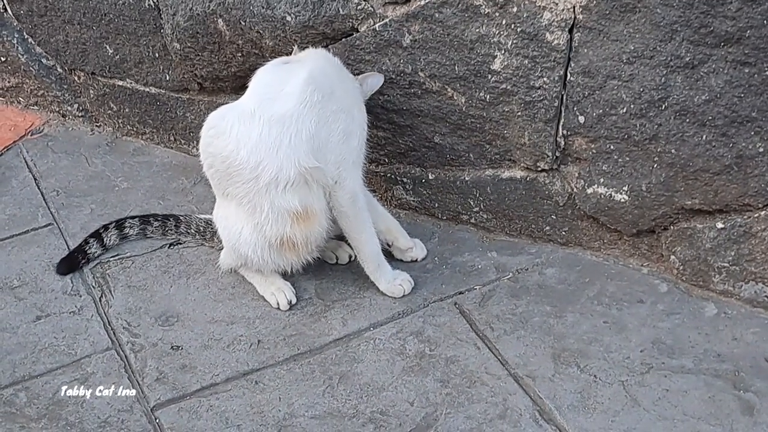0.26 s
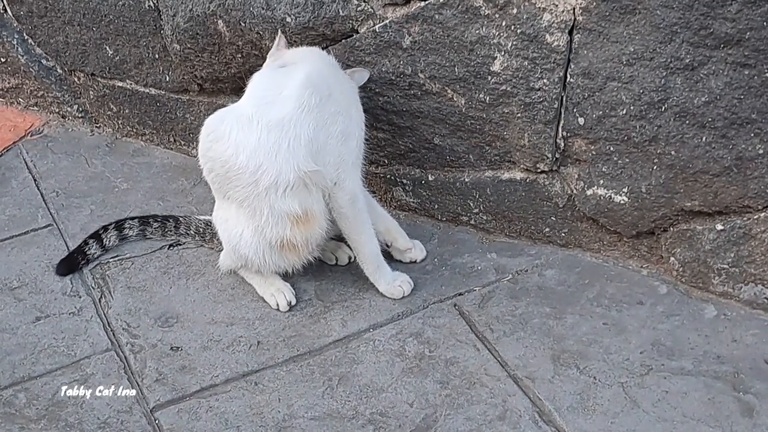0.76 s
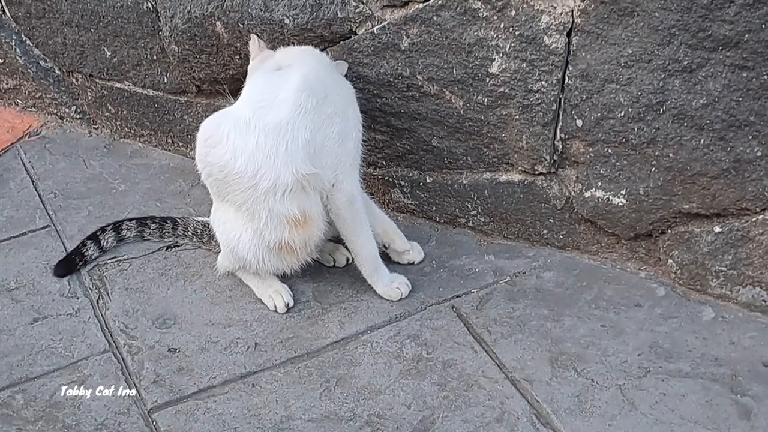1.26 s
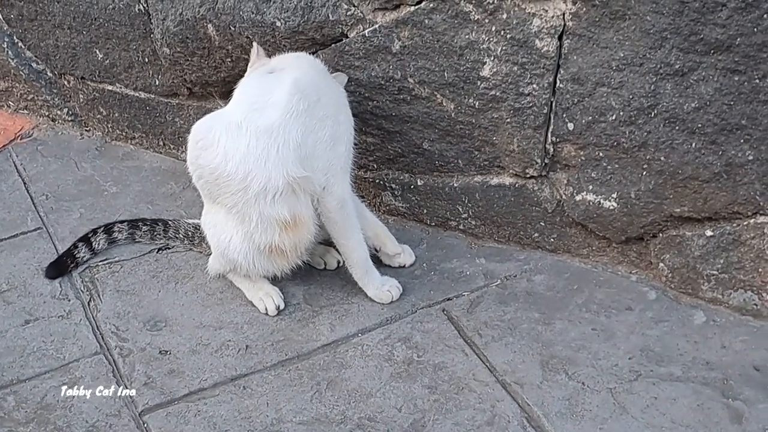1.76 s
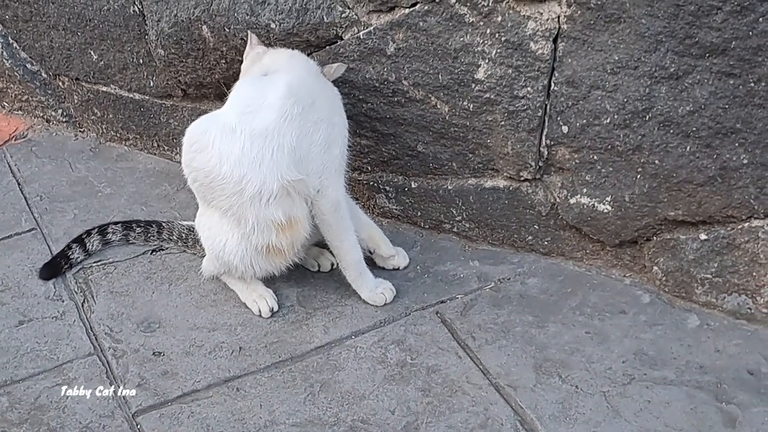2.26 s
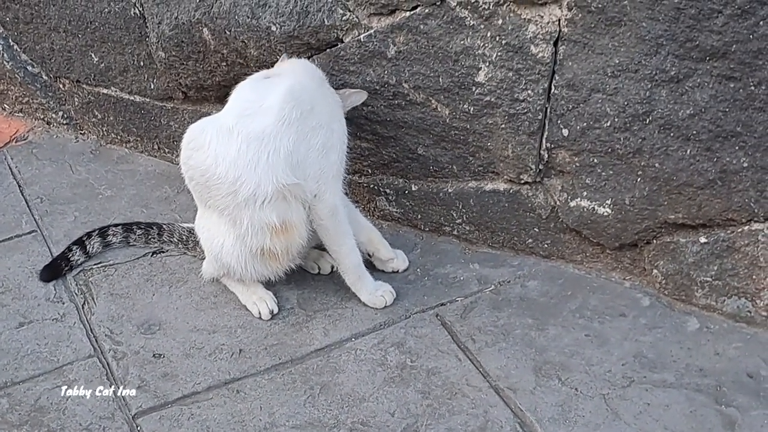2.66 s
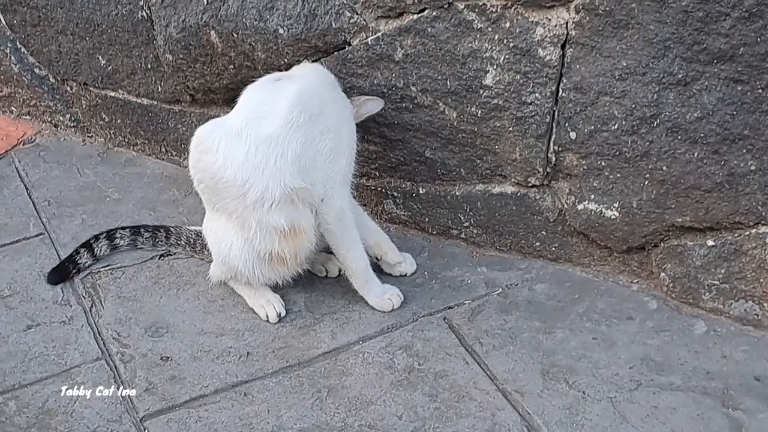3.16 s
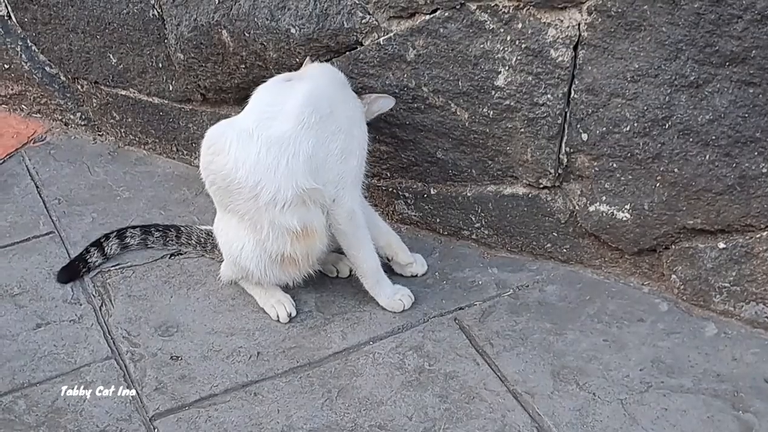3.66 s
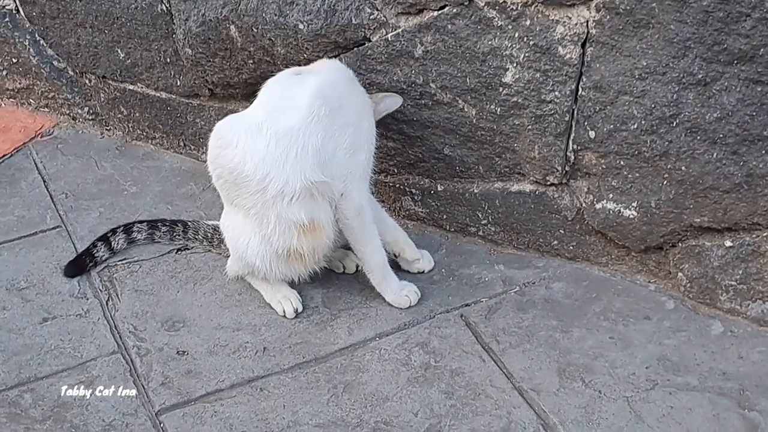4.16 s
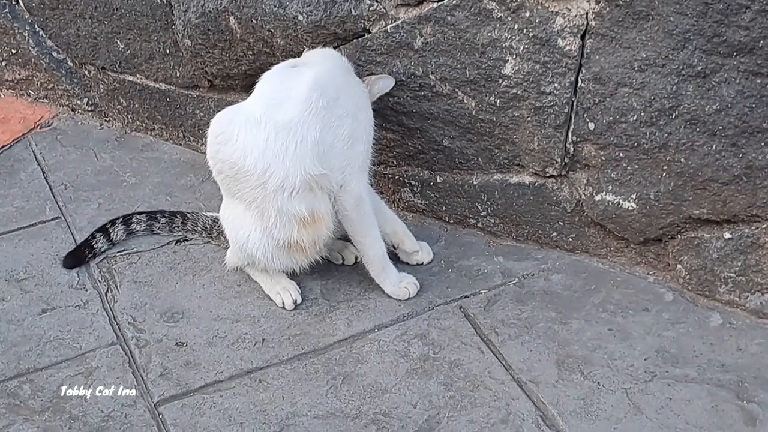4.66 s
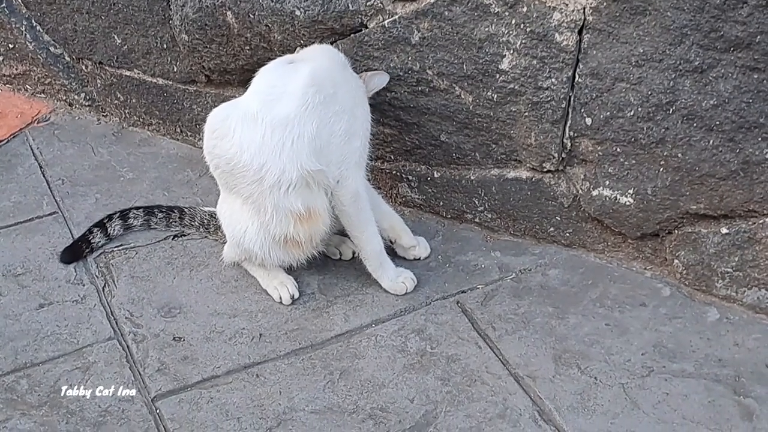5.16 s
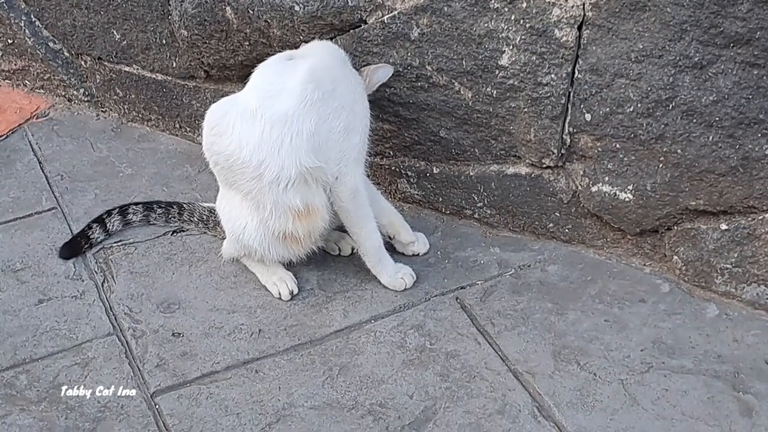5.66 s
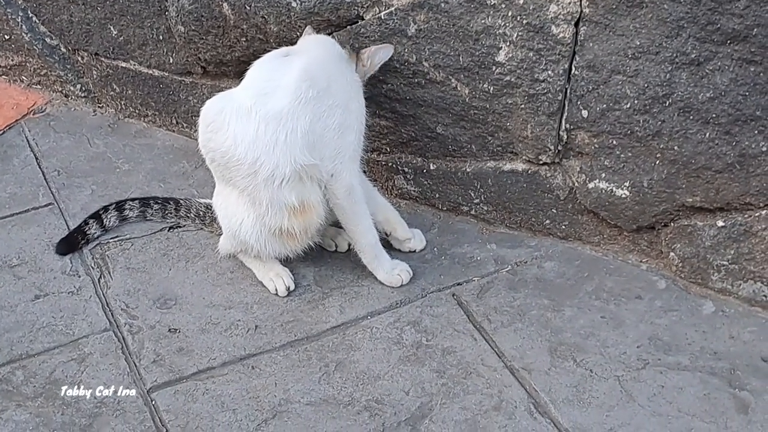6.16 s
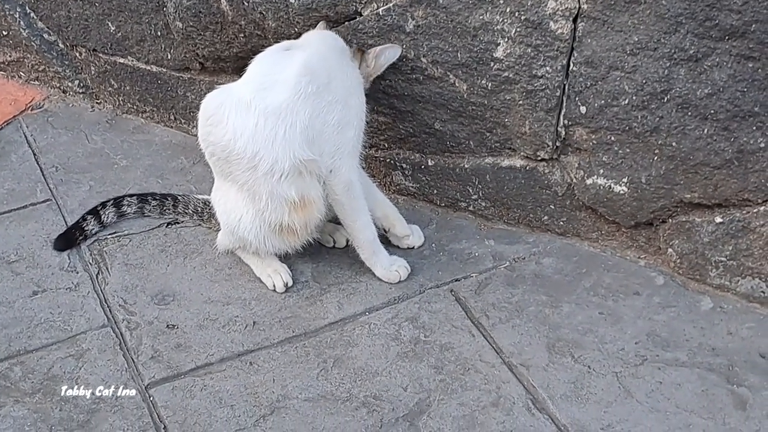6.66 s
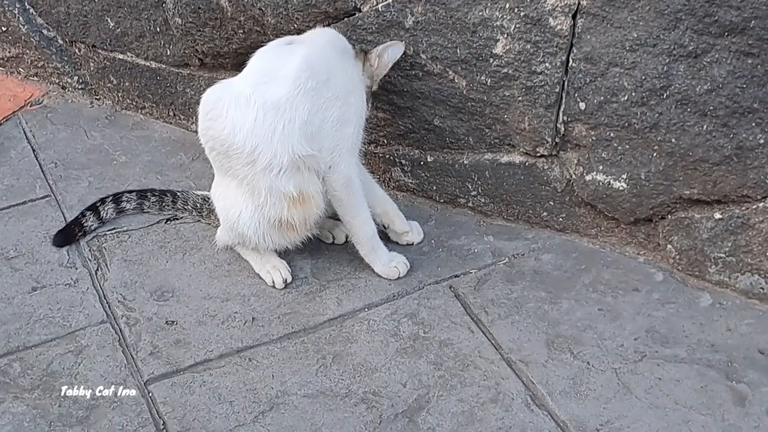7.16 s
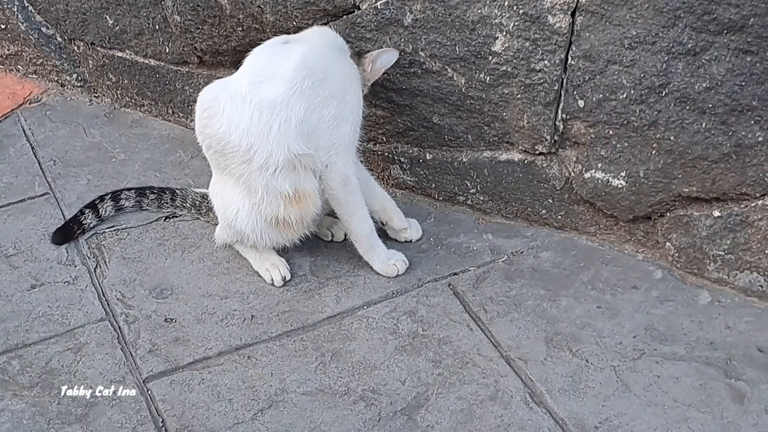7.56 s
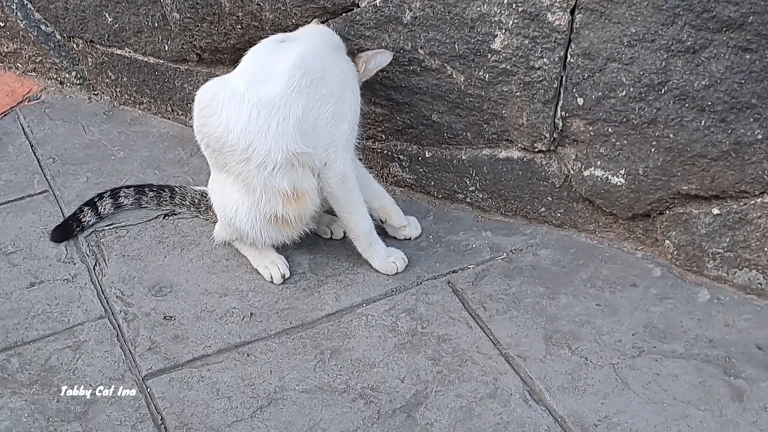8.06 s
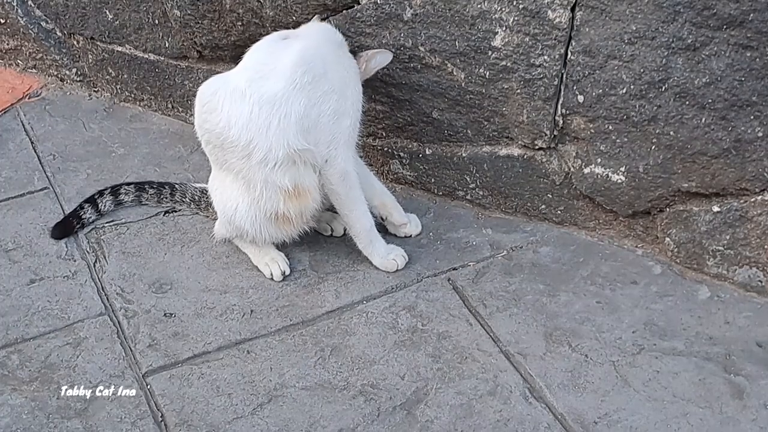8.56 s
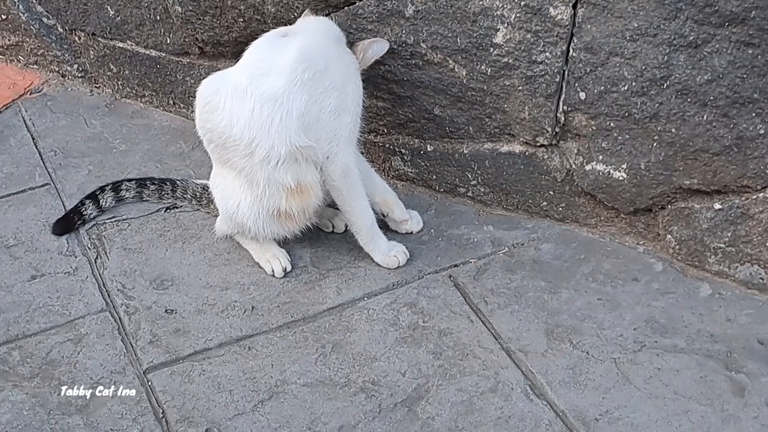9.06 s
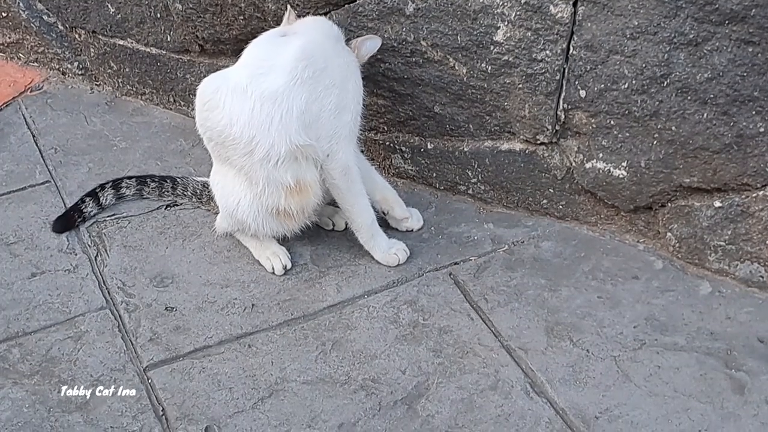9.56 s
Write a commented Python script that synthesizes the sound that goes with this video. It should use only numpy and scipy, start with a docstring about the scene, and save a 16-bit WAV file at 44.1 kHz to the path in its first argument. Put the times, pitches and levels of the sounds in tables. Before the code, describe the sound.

A single-cylinder motorbike putters up a stone-walled street, accelerates close past from right to left, then fades with two dips in engine note over town rumble.

```python
"""Motorbike passing along a stone street

A single-cylinder motorbike accelerates, passes close by from right to left and dips its engine note
twice as it leaves. Rings from pulses make its exhaust, shaped noise its tyres and chain, and fading
noise tails the answer of the walls. Town engines rumble in filtered noise and pulses; a wavering
tone is a faint brake squeal, filtered clicks are dull thuds, and bursts of noise make a few short
swishes and low swells of rumble."""
import sys
import numpy as np
from scipy import signal
from scipy.fft import rfft, irfft, next_fast_len
from scipy.io import wavfile
from scipy.ndimage import uniform_filter1d, map_coordinates

SR = 44100
rng = np.random.default_rng(int(sys.argv[2]) if len(sys.argv) > 2 else 0)


def transcribe(signal):
    """Save signal, clipped to [-1, 1], as a 16-bit WAV file at the path in sys.argv[1]."""
    frames = np.atleast_2d(signal).T
    limited = np.clip(frames, -1, 1)
    pcm = np.round(limited * 32767).astype(np.int16)
    wavfile.write(sys.argv[1], SR, pcm)


N = 432168

PASS_S, BIKE_M_PER_S, CLOSEST_M = 3.934, 5.57, 4.18  # when, how fast and how near the bike goes by
EAR_LAG_MS = 0.517  # between the ears, for a sound from far along the street


def amp(db):
    """Decibels turned into a plain gain."""
    return 10 ** (np.asarray(db) / 20)


def unit(x):
    """x scaled to an rms (average strength) of 1."""
    return x / np.sqrt(np.mean(x ** 2) + 1e-20)


def steady(x):
    """x with its strength over each quarter second held near 1."""
    power = np.mean(np.atleast_2d(x) ** 2, axis=0)
    return x / np.sqrt(np.abs(uniform_filter1d(power, SR // 4)) + 1e-20)


def along(points, hz):
    """Values read between (Hz, value) points, on a log frequency axis."""
    point_hz, values = np.transpose(points)
    return np.interp(np.log(hz + 1), np.log(point_hz), values)


def curves(rows):
    """One value per sample for each column after the time."""
    s, *columns = np.transpose(rows)
    return [np.interp(np.arange(N) / SR, s, column) for column in columns]


def wobble(rate):
    """A smooth random curve through rate random points a second."""
    points = rng.standard_normal(int(N * rate / SR) + 4)
    return map_coordinates(points, [np.arange(N) * rate / SR])


def bump(s, half_s):
    """A soft rise and fall around time s."""
    return np.exp(-((np.arange(N) / SR - s) / half_s) ** 2)


def swells(rows):
    """A level curve of soft bumps."""
    return sum(amp(db) * bump(s, half_s) for s, half_s, db in rows)


def filtered(x, response):
    """x with each frequency scaled and shifted by a complex response."""
    size = next_fast_len(N + SR // 2)
    spectrum = rfft(x, size) * response(np.fft.rfftfreq(size, 1 / SR))
    return irfft(spectrum, size)[..., :N]


def resonance(hz, centre_hz, width_hz, count=2):
    """Like chambers in a row: one starts sharply, two swell."""
    damping = 1j * hz * width_hz
    return (damping / (centre_hz ** 2 - hz ** 2 + damping)) ** count


def swept(x, centre_hz, width_hz, count=2):
    """A moving resonance as a cross-fade of 12 fixed ones."""
    centres = np.geomspace(centre_hz.min(), centre_hz.max(), 12)
    place = np.interp(centre_hz, centres, np.arange(len(centres)))
    total = 0
    for k, centre in enumerate(centres):
        share = np.maximum(1 - abs(place - k), 0)
        total = total + share * filtered(x, lambda hz: resonance(hz, centre, width_hz, count))
    return total


def muffled(x, edge_hz):
    """A steep treble cut takes off the sharp front of each pulse, as a silencer's packing does."""
    return signal.sosfilt(signal.butter(6, edge_hz, fs=SR, output="sos"), x)


def lagged(x, lag_ms):
    """x in both ears, later in the left one when the lag is positive."""
    left = map_coordinates(x, [np.arange(N) - lag_ms * SR / 1000])
    return np.array([left, x])


def rush(spectrum, direct, lag_ms, patchy_db, apart_hz=700):
    """Patchy stereo noise: a direct share of power, the rest diffuse and alike only below apart_hz."""
    grains = signal.stft(rng.standard_normal((3, N)), nperseg=1024)[2]
    patches = rng.standard_normal(grains.shape[1:])
    patches = uniform_filter1d(uniform_filter1d(patches, 4, 0), 14, 1)  # smooth over pitch, then time
    noise = signal.istft(grains * amp(patchy_db * unit(patches)), nperseg=1024)[1][:, :N]

    def split(hz):
        return np.sqrt(.5 + np.outer([.5, -.5], np.exp(-(hz / apart_hz) ** 2)))
    mid, side = filtered(noise[:2], split)
    diffuse = np.array([mid + side, mid - side])
    pair = np.sqrt(direct) * lagged(noise[2], lag_ms) + np.sqrt(1 - direct) * diffuse
    return unit(filtered(pair, lambda hz: amp(along(spectrum, hz))))


def street(x, lag_ms, apart_hz, wet, count=11):
    """Walls return a fading echo, alike in both ears below apart_hz; wet is its share of the power."""
    # Each row: frequency in Hz, time to fade by 60 dB in seconds.
    fade_times = [(80, 1), (400, 0.58), (3000, 0.94)]
    hz, t, grains = signal.stft(rng.standard_normal((count, 2, SR // 3)), SR, nperseg=256)
    fade_db = -60 * t / along(fade_times, hz)[:, None]
    tails = signal.istft(grains * amp(fade_db), SR, nperseg=256)[1]
    # every stretch of road has its own echo pattern
    hop = N // (count - 1) + 1
    padded, answer = np.pad(x, (hop, 2 * hop)), np.zeros((2, 2 * N))
    for k, tail in enumerate(tails):
        stretch = padded[k * hop:][:2 * hop] * signal.windows.cosine(2 * hop)
        echo = signal.fftconvolve(stretch[None], tail, axes=1)
        answer[:, k * hop:][:, :echo.shape[1]] += echo
    mid, side = answer[:, hop:][:, :N]
    side = filtered(side, lambda f: f / np.hypot(f, apart_hz))
    walls = steady(np.array([mid + side, mid - side]))
    return steady(np.sqrt(1 - wet) * lagged(steady(x), lag_ms) + np.sqrt(wet) * walls)


def ride():
    """The bike's distance (m) and its bearing, from -1 (coming) to 1 (going)."""
    along_m = BIKE_M_PER_S * (np.arange(N) / SR - PASS_S)
    distance_m = np.hypot(along_m, CLOSEST_M)
    return distance_m, along_m / distance_m


def passing(db, doubling_db, shut_db, rear_db):
    """Gain of a bike part: db alongside at full throttle, less doubling_db per doubling of distance,
    less shut_db with the throttle shut, plus rear_db from behind."""
    # The rider opens up, shuts off to shift, rides on gently and shuts off again.
    # Each row: time in seconds, throttle from 0 to 1.
    throttle_points = [(0, 0.31), (1.85, 0.2), (2.35, 0.97), (6.3, 0.98), (6.55, 0.47), (7, 0.2),
                       (7.8, 0.46), (8.9, 0.2), (9.6, 0.06)]
    distance_m, bearing = ride()
    throttle, = curves(throttle_points)
    far_db = doubling_db * np.log2(distance_m / CLOSEST_M)
    return amp(db - far_db - shut_db * (1 - throttle) + rear_db * bearing)


def firings(turns, scatter_db, jitter_s):
    """One pressure pulse per firing, each a little different in size and timing."""
    at = np.flatnonzero(np.diff(np.floor(turns)))
    chance = rng.standard_normal((len(at), 2))
    at = np.clip(at + jitter_s * SR * chance[:, 0], 0, N - 1).astype(int)
    return np.bincount(at, amp(scatter_db * chance[:, 1]), N)


def exhaust(turns):
    """Each firing swells and rings in the silencer's chambers and the tail pipe, above clean low orders."""
    # The exhaust changes colour as the pipe swings past.
    # Each row: time in seconds, thump pitch in Hz, bark pitch in Hz.
    pipe = [(0, 88, 212), (1.3, 96, 244), (2.05, 110.4, 253), (2.55, 113, 335), (2.85, 122, 297),
            (3.1, 139, 280), (3.35, 176, 280), (3.7, 168.4, 314), (4.6, 171.4, 341), (5.1, 187, 250),
            (6.1, 203, 243), (6.9, 131, 277), (7.8, 148, 304), (8.45, 172, 321), (9.1, 131, 220)]
    # Share of the sound coming by way of the walls, least when the pipe is in plain view.
    # Each row: time in seconds, share from 0 to 1.
    indirect = [(0, .45), (2.3, .38), (3, .27), (3.35, .07), (4.6, .1), (5.3, .35), (6.5, .6), (9, .85)]
    # Single multiples of the firing rate ring out as pipe and walls reinforce them.
    # Each row: time in seconds, half length in seconds, multiple of the firing rate, level in dB.
    hum_rows = [(1.297, 0.18, 12, -34.5), (1.49, 0.22, 4, -27.5), (2, 0.16, 5, -26), (2.4, 0.19, 4, -29),
                (2.92, 0.14, 11, -37), (3.093, 0.33, 3, -37), (3.047, 0.16, 4, -36),
                (4.297, 0.31, 3, -27.5), (4.244, 0.18, 6, -33), (5.2, 0.37, 6, -38), (5.394, 0.1, 17, -41),
                (5.42, 0.098, 16, -51), (5.8, 0.12, 16, -39), (5.55, .3, 13, -59), (5.948, .35, 14, -44.5),
                (7.22, 0.16, 4, -31.5), (8.15, 0.3, 7, -42.5), (8.373, 0.26, 5, -32), (8.798, 0.13, 4, -29)]
    # The exhaust's registers swell or dip briefly along the way.
    # Each row: time and half length in seconds, then boom, thump, bark and rasp changes in dB.
    surges = [(0.35, 0.47, 5, 1, -5, 2), (2.054, 0.26, 4, 6, 4.5, 14), (2.74, 0.15, 5.5, 6.5, 1, -14),
              (3.074, 0.29, -1, -3, 10, 10), (3.521, 0.31, 7.5, 6, -0.5, 7),
              (3.83, 0.26, -29, -1.5, -3, -16), (4.35, 0.15, -3, -1.5, -3, 1),
              (4.97, 0.34, -5.5, -4.5, -8, -7.5), (5.487, 0.12, -41, 1.5, 6.5, 1.5),
              (5.944, 0.19, 2, -5, 8.5, 0), (6.8, 0.17, 4, 0.5, -1.5, 4.5),
              (8.102, 0.45, -4, -1.5, -5, -1.5), (9.145, 0.17, -10, 12, 7, 2)]
    pulses = firings(turns, scatter_db=.75, jitter_s=.00007)
    thump_hz, bark_hz = curves(pipe)
    _, bearing = ride()
    lag_ms = -EAR_LAG_MS * bearing
    wet, = curves(indirect)

    thump = muffled(swept(pulses, thump_hz, width_hz=58), edge_hz=251)
    thump = street(thump, 0.96 * lag_ms, apart_hz=710, wet=wet)
    bark = muffled(swept(pulses, bark_hz, width_hz=56), edge_hz=359)
    bark = street(bark, 0.58 * lag_ms, apart_hz=714, wet=wet)

    def rasp_ring(hz):
        main = resonance(hz, centre_hz=651.4, width_hz=66)
        return main + amp(-9.5) * resonance(hz, centre_hz=542, width_hz=200)
    rasp = filtered(pulses, rasp_ring) * amp(1.2 * wobble(45))
    rasp = street(rasp, lag_ms, apart_hz=700, wet=.4)

    def order(k):
        return -np.sqrt(2) * np.sin(2 * np.pi * k * turns)
    # the first three multiples of the firing rate, in dB against the second
    boom = sum(amp(db) * order(k) for k, db in enumerate([-21, 0, -19], 1))
    hums = sum(amp(db) * bump(s, half_s) * order(round(k)) for s, half_s, k, db in hum_rows)

    boom_db, thump_db, bark_db, rasp_db = sum(np.outer(dbs, bump(s, half_s)) for s, half_s, *dbs in surges)
    boom = boom * amp(boom_db) * passing(db=-18.5, doubling_db=8.5, shut_db=12.5, rear_db=2.5)
    thump = thump * amp(thump_db) * passing(db=-21.5, doubling_db=5.0, shut_db=-3.5, rear_db=0.0)
    bark = bark * amp(bark_db) * passing(db=-29.5, doubling_db=6.0, shut_db=-1.0, rear_db=-0.5)
    rasp = rasp * amp(rasp_db) * passing(db=-47.5, doubling_db=-0.5, shut_db=19.5, rear_db=10)
    return lagged(hums, 0.16 * lag_ms) + boom + thump + bark + rasp


def running_gear(turns):
    """Tyres and engine case roar; chain and valve gear hiss, pulsing slightly with the engine."""
    # Noise colours: tyres and case coming, the same once past, and the chain.
    # Each row: frequency in Hz, relative level in dB.
    ahead = [(300, -8), (480, 3), (640, -10.5), (900, 2.5), (1150, -3.5), (1500, 2), (1900, 1), (2500, -9),
             (3200, -3.5), (5000, -4.5), (9000, -43)]
    behind = [(300, -44), (470, -4), (620, 11), (800, 3), (1000, 5), (1450, 6), (1800, 2), (2400, 4.5),
              (3200, -6), (5000, 0.5), (9000, -63)]
    chain = [(1500, -51), (2500, -14), (2850, 2), (3150, -5), (3750, 1), (4600, -1), (5250, 2), (5900, -4),
             (6900, -6), (8000, -11.5), (9800, -14.5), (12200, -11.5), (13200, -16), (15400, -20)]
    # A narrow whir as the bike comes alongside, and a sizzle near 5 kHz that flares up, then lingers.
    # Each row: time in seconds, half length in seconds, level in dB.
    whir_rows = [(3.92, 0.083, -39)]
    sizzle_rows = [(4.28, 0.079, -34.5), (5.2, 0.78, -40)]
    even_db = 1.7  # depth of the patches in the noise
    _, bearing = ride()
    lag_ms = -EAR_LAG_MS * bearing
    beat = np.cos(2 * np.pi * turns)

    passed = np.interp(np.arange(N) / SR, [2.9, 3.8], [0, np.pi / 2])  # cross-fade angle
    tyres = np.cos(passed) * rush(ahead, 0.64, lag_ms, patchy_db=3)
    tyres = tyres + np.sin(passed) * rush(behind, 0.19, lag_ms, patchy_db=even_db)
    tyre_gain = passing(db=-30.5, doubling_db=7.0, shut_db=10.0, rear_db=-2.5)

    hiss = rush(chain, 0.17, lag_ms, patchy_db=even_db)
    hiss_gain = passing(db=-31.5, doubling_db=6.0, shut_db=7.5, rear_db=1.0)
    # the highest fizz fades more than the rest whenever the hiss is weaker
    fizz = filtered(hiss, lambda hz: 1 - 1 / (1 + (hz / 9500) ** 8))
    near = 1.03 * (hiss_gain / hiss_gain.max()) ** 0.2
    hiss = hiss - (1 - near) * fizz

    whir_colour = [(1250, -42), (1420, -5), (1465, 12), (1510, -15), (1700, -40), (3000, -77)]
    whir = rush(whir_colour, 0.28, lag_ms, patchy_db=even_db)
    sizzle_colour = [(4100, -35), (4750, -2), (5200, 6), (5450, -7), (6000, -36), (8000, -78)]
    sizzle = rush(sizzle_colour, 0.26, lag_ms, patchy_db=1.0)
    return (tyre_gain * amp(.5 * beat) * tyres + hiss_gain * amp(1.03 * beat) * hiss
            + swells(sizzle_rows) * sizzle + swells(whir_rows) * whir)


def rumble_and_wash():
    """Far engines merge into a lumpy rumble, one standing out a little; a broad wash of tyre noise,
    much of it the passing bike's, swells and fades."""
    # Colours of the rumble and the wash. Each row: frequency in Hz, relative level in dB.
    rumble_colour = [(20, -42), (35, -15), (50, -6), (75, -3), (120, -4), (185, -5.5), (280, -16),
                     (450, -22.5), (900, -73)]
    wash_colour = [(180, -7.5), (300, -5.5), (480, -10), (610, -7.5), (760, -15), (1200, -17.5),
                   (2050, -17.5), (2600, -20.5), (3200, -23.5), (5100, -19.5), (6600, -40), (8800, -51),
                   (12300, -57), (15400, -64)]
    # How loud the wash is. Each row: time in seconds, level in dB.
    wash_level = [(0, -38), (2, -37.5), (3.8, -33.5), (6.1, -34.5), (6.8, -38.5), (8.4, -39), (9.8, -42.5)]
    # A second engine further up the street. Each row: time in seconds, firings a second, level in dB.
    far_engine = [(0, 28, -34), (6.2, 30, -43), (7.1, 38, -37), (7.6, 30.7, -36.5), (8.3, 30.3, -29),
                  (8.9, 32, -29.5), (9.8, 24.3, -32.5)]
    _, bearing = ride()  # the wash drifts along the street with the bike
    rumble_db = -28.5 + .6 * wobble(6)
    rumble = amp(rumble_db) * rush(rumble_colour, 0.93, 0.085, patchy_db=2.0, apart_hz=40)
    wash = amp(curves(wash_level)[0]) * rush(wash_colour, 0.27, -EAR_LAG_MS * bearing, patchy_db=2.5)

    rate, drone_db = curves(far_engine)
    turns = np.cumsum(rate * (1 + 0.00386 * wobble(3))) / SR
    pulses = firings(turns, scatter_db=3.0, jitter_s=.0001)
    drone = filtered(pulses, lambda hz: resonance(hz, centre_hz=100.3, width_hz=42.0))
    drone = street(drone, lag_ms=0, apart_hz=402, wet=0.48)
    return rumble + wash + amp(drone_db) * drone


def low_swells():
    """Short low swells of rumble, made of noise that differs in each ear, one as the bike passes."""
    # Each row: time in seconds, half length in seconds, level in dB.
    swell_rows = [(.15, 0.18, -29), (.66, 0.19, -25.5), (1.05, 0.19, -24), (3.85, 0.16, -22),
                  (5.27, 0.072, -29), (7.2, 0.16, -31)]
    # Colour of the rumble. Each row: frequency in Hz, relative level in dB.
    colour = [(15, -25), (30, -10), (50, -5), (85, 4), (150, -18), (300, -53), (600, -76)]
    lumps = amp(1.5 * np.array([wobble(6), wobble(29)]))  # left lumps are slow, right ones fast
    return swells(swell_rows) * unit(lumps * rush(colour, 0, 0, patchy_db=1.0, apart_hz=1))


def thuds():
    """Dull low thuds, four near the start and four around 7 s, each a click ringing in a resonance."""
    # Each row: time in seconds, peak level in dB.
    thud_rows = [(0.163, -19), (0.488, -18), (.66, -22), (.818, -20), (6.802, -23), (6.933, -12),
                 (7.234, -17), (7.359, -13)]
    blows = np.zeros(N)
    for s, db in thud_rows:
        blows[round(s * SR)] = amp(db)

    def ring(x):
        thud = filtered(x, lambda hz: -resonance(hz, centre_hz=135, width_hz=70, count=1))
        return muffled(thud, edge_hz=260)
    return ring(blows) / abs(ring(signal.unit_impulse(N))).max()


def brake():
    """A brake disc sings on one thin note that stutters as the pad grips and slips."""
    # Touches of the brake. Each row: time in seconds, half length in seconds, level in dB.
    squeals = [(4.6, 0.072, -49), (5.9, .06, -49), (6.36, .025, -59), (6.6, 0.2, -59), (6.97, 0.2, -54),
               (7.47, .06, -58), (7.65, 0.35, -61.5)]
    pitch_hz = 6629 + 18 * wobble(90)
    phase = 2 * np.pi * np.cumsum(pitch_hz) / SR
    flutter = unit(amp(3 * np.array([wobble(80), wobble(80)])))
    tone = np.sqrt(2) * np.array([np.sin(phase), np.sin(phase + 1)])  # out of step between the ears
    return swells(squeals) * flutter * tone


def swishes():
    """Short soft bursts of hiss, made of shaped noise."""
    # Each row: time in seconds, half length in seconds, level in dB.
    bursts = [(7.324, 0.058, -40.5), (7.559, 0.055, -45.5), (7.77, 0.23, -48)]
    # Colour of the hiss. Each row: frequency in Hz, relative level in dB.
    colour = [(600, -1), (1500, -11), (5000, 7), (7000, -4), (9500, -15), (12300, -13), (15000, -26)]
    return swells(bursts) * rush(colour, 0.42, -0.4, patchy_db=-2.5)


def scene():
    """The engine's turning drives the bike's sounds; the street's other sounds join in."""
    # The engine's pace. Each row: time in seconds, firings a second.
    speed = [(0, 18.4), (.55, 18.9), (1.25, 20.2), (1.8, 20.8), (2.1, 21.5), (2.35, 23.8), (2.7, 24.9),
             (3, 26.3), (3.2, 28.15), (3.5, 30.6), (4.2, 34.95), (4.6, 37.3), (5, 39.2), (5.5, 40.8),
             (5.8, 41.6), (6.25, 42.4), (6.5, 39.8), (6.9, 32), (7.12, 40), (7.95, 41.8), (8.5, 42),
             (8.9, 42.5), (9.25, 38.7), (9.45, 34), (9.8, 31)]
    rate = curves(speed)[0] * (1 + 0.001 * wobble(8))
    turns = .19 + np.cumsum(rate) / SR  # it starts .19 of the way through a cycle
    bike = exhaust(turns) + running_gear(turns)
    return bike + rumble_and_wash() + low_swells() + thuds() + brake() + swishes()


def record(dry):
    """Each microphone port has its own colour; nothing passes above the band limit."""
    # How the two ports differ. Each row: frequency in Hz, left minus right level in dB.
    port_difference = [(250, 0), (500, 3.5), (800, 0), (1500, 2), (2100, -2.5), (2800, -2), (3900, -12),
                       (5000, -13.5), (6400, -1.5), (7800, 4.5), (9800, 3.5), (12200, 3), (15000, 8)]
    top_hz = 15500

    def ports(hz):
        ratio = amp(along(port_difference, hz))
        pair = np.array([ratio, np.ones_like(ratio)])
        return pair * np.sqrt(2 / (1 + ratio ** 2)) * (hz < top_hz)  # total power stays the same
    return filtered(dry * signal.windows.tukey(N, .001), ports)  # brief fades at both ends


dry = scene()
out = record(dry)
transcribe(out)
```